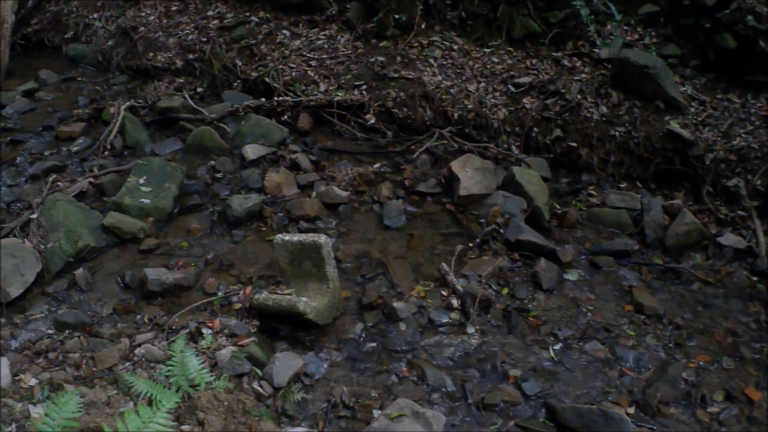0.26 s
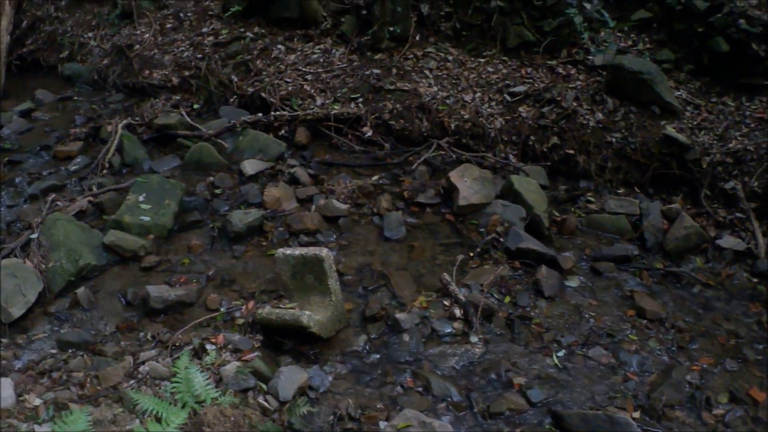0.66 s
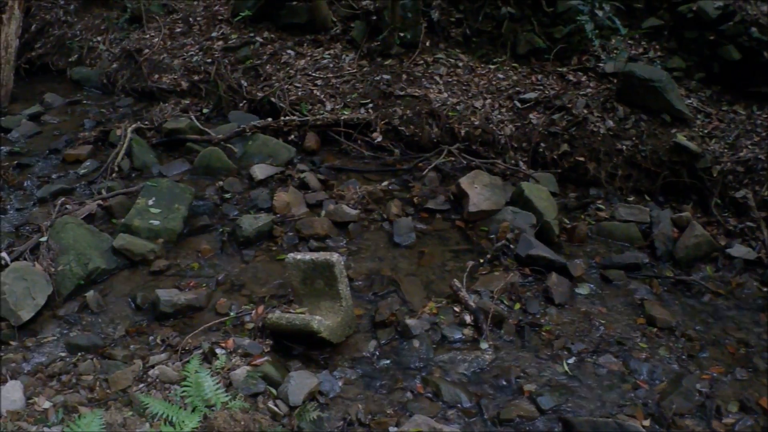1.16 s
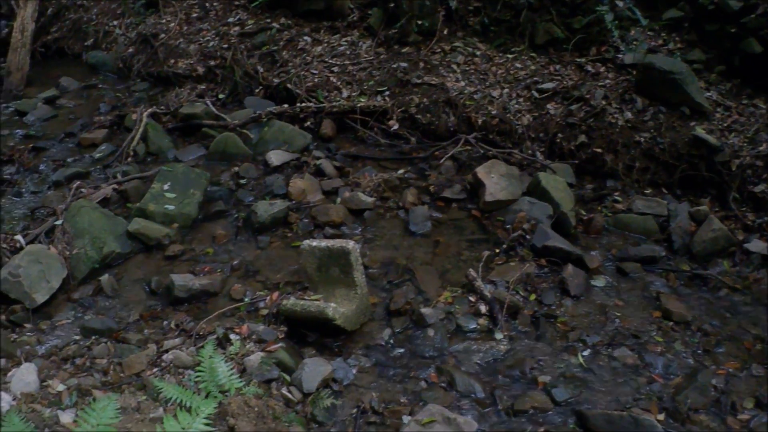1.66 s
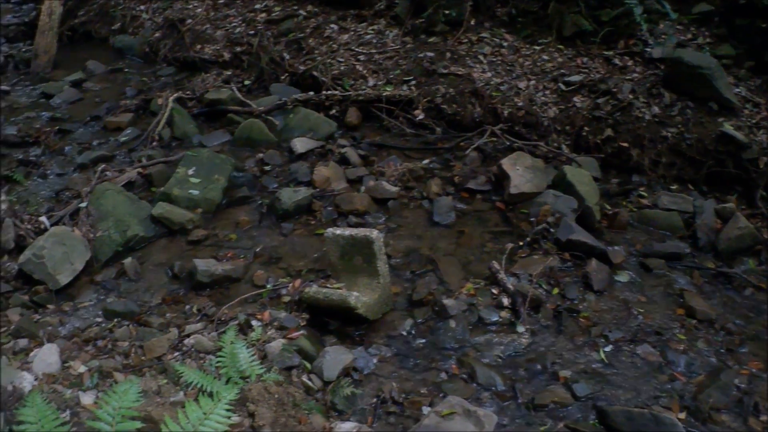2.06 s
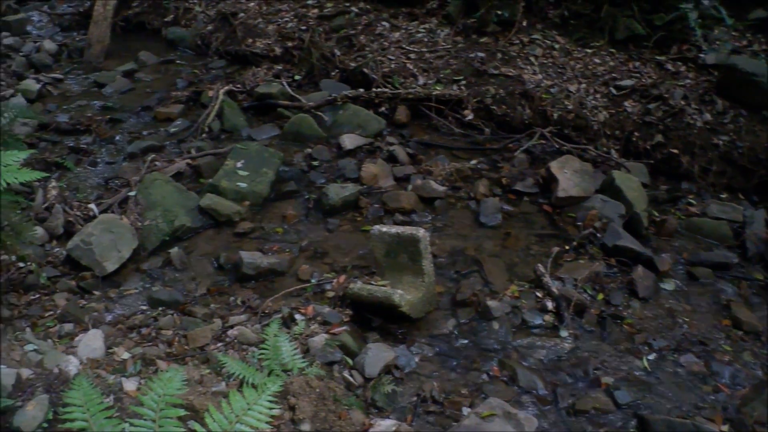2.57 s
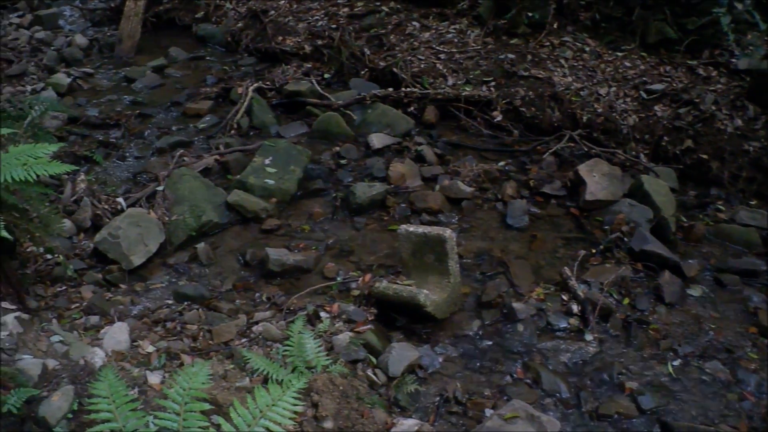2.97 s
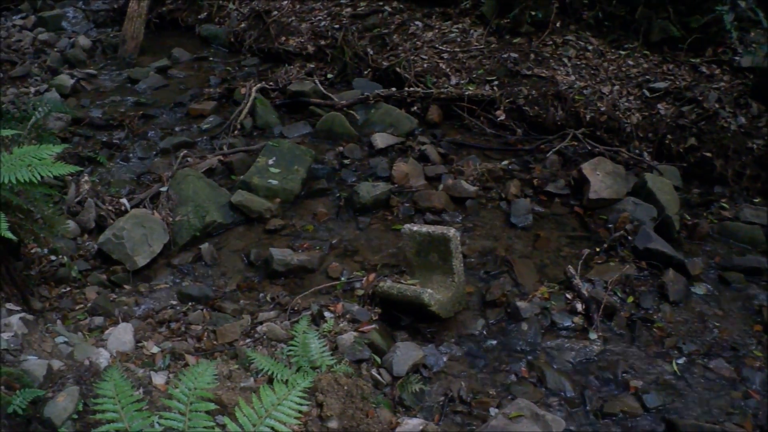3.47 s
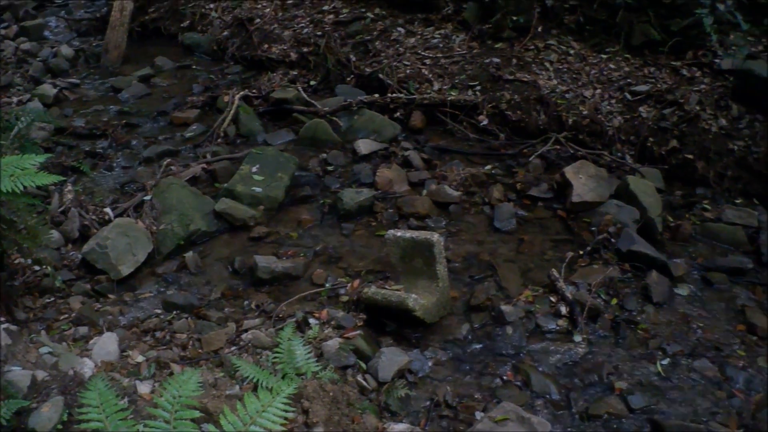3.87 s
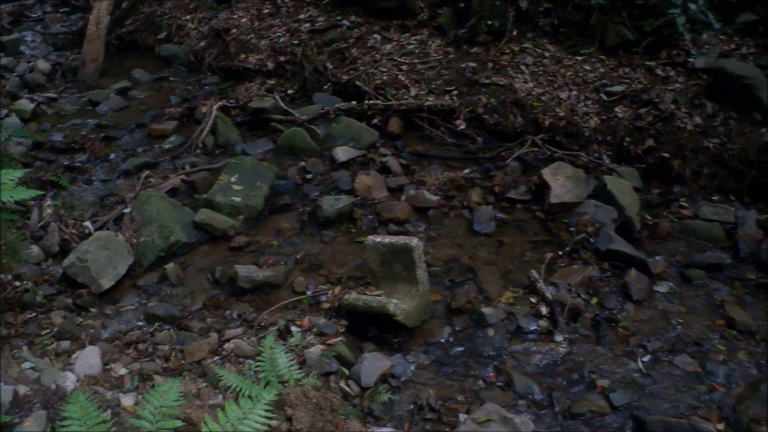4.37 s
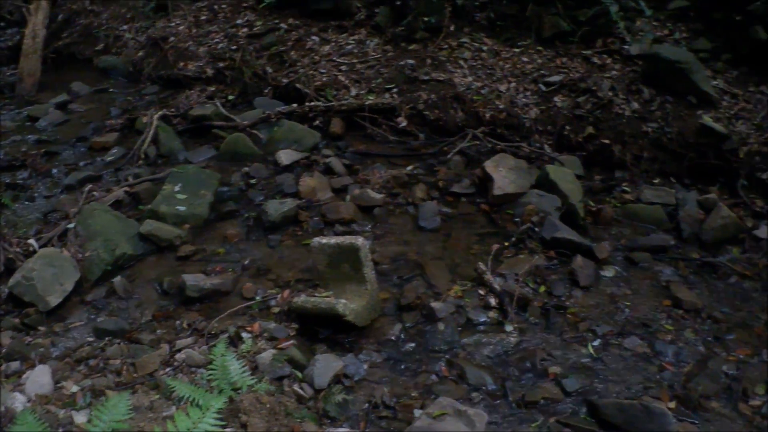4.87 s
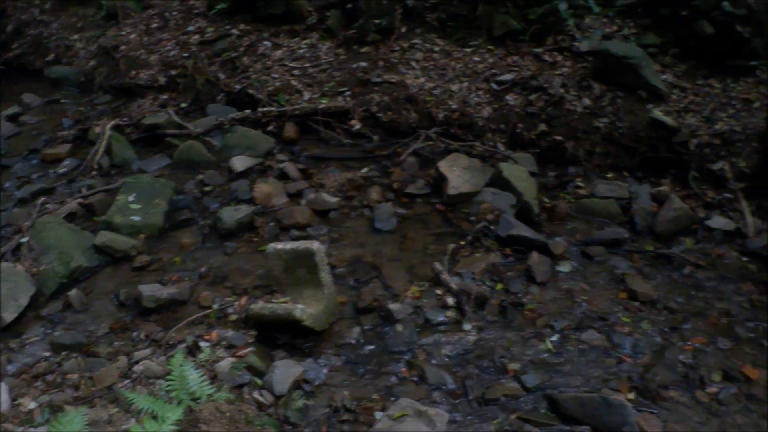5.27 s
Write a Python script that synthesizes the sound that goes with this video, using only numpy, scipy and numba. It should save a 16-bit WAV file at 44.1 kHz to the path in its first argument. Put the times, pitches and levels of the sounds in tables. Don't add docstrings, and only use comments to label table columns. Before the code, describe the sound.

A shallow woodland stream hisses and rumbles softly throughout, wide in stereo. From 0 to 0.7 s a faint distant bird gives short whistles, low, two high, low. From 0.7 to 1.8 s a nearer bird, towards the right, alternates high and low gliding, buzzy-edged whistles, five notes, with a woodland echo. Then only water until about 2.7 s, when the scene cuts closer to the stream. Faint clicks start at once; a weak short croak comes at 3.0 s with two small drops. Strong croaks follow at 3.4 (the longest), 3.7, 4.0 and 4.3 s, each a tight hollow buzz that slows and roughens, with stray clicks between. The water swells until 3.7 s, then sinks. At 4.65 s a rasp breaks into a rattle of loud clicks. Weaker, lower rasps come at 5.0 and 5.3 s, beside tiny drops and a very faint hollow gurgle, to the end at about 5.6 s.

```python
import sys
import numpy as np
from scipy import signal
from scipy.fft import rfft, irfft
from scipy.io import wavfile
from scipy.ndimage import uniform_filter1d
from numba import njit

SR = 44100
rng = np.random.default_rng(int(sys.argv[2]) if len(sys.argv) > 2 else 0)


def bounce(signal):
    frames = np.transpose(np.atleast_2d(signal))
    limited = np.clip(frames, -1, 1)
    pcm = np.round(limited * 32767).astype(np.int16)
    wavfile.write(sys.argv[1], SR, pcm)


def decibels_to_gain(level_db):
    exponent = np.asarray(level_db, float) / 20
    return 10 ** exponent


N = 243431


def along(table, hz):
    points_hz, values = np.transpose(table)
    return np.interp(np.log(hz), np.log(points_hz), values)


def curves(table):
    s, *columns = np.transpose(table)
    return np.array([np.interp(np.arange(N) / SR, s, column) for column in columns])


def walk(rate_hz):
    hold = int(SR / rate_hz)
    steps = np.repeat(rng.standard_normal(N // hold + 1), hold)
    return 1.41 * uniform_filter1d(uniform_filter1d(steps, hold), hold)[:N]


def placed(x, pan_db, lag):
    turn = np.exp(-2j * np.pi * np.arange(N // 2 + 1) / N * lag)
    left = irfft(rfft(x) * turn, N)
    return np.array([left * decibels_to_gain(pan_db / 2), x * decibels_to_gain(-pan_db / 2)])


def echoes(x, t60, gap_s):
    t = np.arange(int(1.2 * SR)) / SR
    fade = np.exp(-np.log(1000) * t / t60) * np.clip(t / gap_s, 0, 1)
    tail = rng.standard_normal((2, len(t))) * fade
    tail = tail / np.sqrt(np.sum(tail ** 2, 1, keepdims=True))
    return signal.fftconvolve(x[None], tail, axes=1)[:, :N]


CHANGE_S = 2.694
# hz, level_db (per Hz)
BANK = [(12, -36), (20, -8.5), (70, -2), (116, -6), (182, -6), (328, -11.5), (388, -7), (421, -10.5),
        (513, -12), (975, -10), (1610, -18.5), (1750, -19.5), (2520, -22), (5840, -20), (16000, -27.5)]
# hz, level_db (per Hz)
WATER = [(12, -33), (20, -8.5), (86, -2.5), (172, -8.5), (377, -10.5), (433, -10), (527, -8.5), (825, -12),
         (948, -8.5), (1330, -11.5), (2320, -19), (4290, -16.5), (9660, -16), (14700, -26.5), (16000, -17)]
# time_s, level_db
FLOW = [(0, -1.5), (2.2, -2), (2.69, -1), (3.2, 1), (3.7, 2), (4.0, 0.5), (4.25, -6.5), (4.9, -7.5),
        (5.35, -4.5), (5.6, -8)]
# hz, share (0-1)
FLOW_SHARE = [(150, 0.88), (700, 0.63), (3000, 0.2)]
# hz, likeness (0-1)
LIKENESS = [(60, 0.91), (300, 0.73), (1000, 0.72), (2500, 0.41), (8000, 0.07), (13000, 0.36)]
# hz, level_db
TILT = [(60, -2.4), (500, -1.6), (2000, -1), (6000, -3.5), (13000, -1.7)]


def stream(db, lag, swell_db, flicker_db):
    t = np.arange(N) / SR
    bins_hz = np.arange(1, N // 2 + 2) * SR / N
    flow = curves(FLOW)[0]
    for part in (t < CHANGE_S, t >= CHANGE_S):
        flow[part] -= flow[part].mean()
    shared, own = rfft(rng.standard_normal((2, N)))
    like = np.clip(along(LIKENESS, bins_hz), 0, 1)
    left = (like * shared + np.sqrt(1 - like ** 2) * own) * np.exp(-2j * np.pi * bins_hz * lag / SR)
    pair = np.array([left, shared]) * decibels_to_gain(np.outer([.5, -.5], along(TILT, bins_hz)))
    out, swell = 0, walk(15)
    for hz in 20 * 2 ** np.arange(0, 10.1, .5):
        share = np.clip(1 - 2 * np.abs(np.log2(bins_hz / hz)), 0, 1)
        follow = along(FLOW_SHARE, hz) * flow
        colour = np.where(t < CHANGE_S, along(BANK, hz) + db[0], along(WATER, hz) + db[1])
        wobble = swell_db * min(hz / 3000, 1) * swell + flicker_db * walk(20)
        out = out + decibels_to_gain(colour + follow + wobble) * irfft(pair * np.sqrt(share), N)
    return out


# start_s, length_s, start_hz, end_hz, level_db
DRIPS = [
    (2.968, 0.011, 2600, 2780, -49.5),
    (3.058, .01, 1350, 1400, -46),
    (4.87, .012, 5320, 5600, -53),
    (5.106, .008, 2250, 2350, -53),
    (5.118, .11, 580, 650, -52.5),
    (5.203, 0.31, 400, 396.5, -58),
]


def drips(waver=.04):
    out = np.zeros(N)
    for s, length, hz0, hz1, db in DRIPS:
        first = int(s * SR)
        part = np.linspace(0, 1, min(int(length * SR), N - first))
        hz = (hz0 + (hz1 - hz0) * part) * (1 + waver * walk(62.8)[:len(part)])
        ring = np.sin(2 * np.pi * np.cumsum(hz) / SR)
        out[first:][:len(part)] += decibels_to_gain(db) * np.sqrt(np.sin(np.pi * part)) * ring
    return placed(out, pan_db=-3.0, lag=0.81)


# time_s (from note start), pitch_hz, level_db
HIGH_NOTE = [(0, 6900, -11), (.02, 7250, -3), (.036, 6900, -2), (.052, 6600, 0), (.072, 6400, -3),
             (.085, 6950, -6), (.093, 7500, -20), (.102, 8200, -12), (.125, 8250, -14)]
LOW_NOTE = [(0, 3500, -13), (.022, 3900, -6), (.042, 4300, 0), (.062, 4600, -1), (.084, 4750, -1),
            (.1, 4580, -7), (.113, 4350, -6), (.124, 4080, -4), (.13, 3950, -14)]
FAR_HIGH = [(0, 6800, 3), (.015, 6540, -1), (.032, 7150, 0), (.042, 5800, -2), (.048, 5260, -7),
            (.072, 6700, 1.5), (.078, 6400, -8)]
FAR_LOW = [(0, 3650, 1), (.025, 4400, 0), (.046, 4850, -3), (.06, 4190, 0), (.078, 4920, -5),
           (.086, 4900, -5), (.1, 4100, 2)]
# note, start_s, level_db, stretch (ratio)
NEAR_SONG = [
    (HIGH_NOTE, .718, -44, 0.9),
    (LOW_NOTE, 0.942, -45.5, 1.0),
    (HIGH_NOTE, 1.172, -42, 0.96),
    (LOW_NOTE, 1.405, -45.5, 1.03),
    (HIGH_NOTE, 1.628, -41.5, 1.03),
]
# note, start_s, level_db, stretch (ratio)
FAR_SONG = [
    (FAR_LOW, -.07, -54, 1.0),
    (FAR_HIGH, .158, -57, 1.0),
    (FAR_HIGH, .348, -57, 1.08),
    (FAR_LOW, .538, -53, 1.0),
]


def bird(song, warble_hz, depth, pan_db, lag, wet_db, t60, far_db):
    out, t = np.zeros(N), np.arange(N) / SR
    for note, start, db, stretch in song:
        s, hz, shape_db = np.transpose(note)
        s = start + stretch * s
        on = (t > s[0]) & (t < s[-1])
        pitch = np.interp(t[on], s, hz) * (1 + depth * np.sin(2 * np.pi * warble_hz * t[on]))
        edge = np.clip(np.minimum(t[on] - s[0], s[-1] - t[on]) / 0.0028, 0, 1)
        level = decibels_to_gain(db + np.interp(t[on], s, shape_db)) * edge
        out[on] += level * np.sin(2 * np.pi * np.cumsum(pitch) / SR)
    dull = signal.sosfilt(signal.butter(2, 5500, fs=SR, output="sos"), out)
    near_woods = decibels_to_gain(wet_db) * echoes(out, t60, gap_s=.006)
    far_woods = decibels_to_gain(far_db) * echoes(dull, t60=1.2, gap_s=.08)
    return placed(out, pan_db, lag) + near_woods + far_woods


# start_s, length_s, first_rate_hz, peak_db, lower_db (lower chamber re upper)
RASPS = [(3.381, 0.035, 371, -30.5, -8.5), (4.650, 0.018, 294.7, -19.5, -8),
         (5.02, .011, 269.5, -33.5, 3.5), (5.031, .016, 444, -29.5, -8.5), (5.051, .015, 394.3, -29, -15.5),
         (5.067, .017, 275, -32.5, 5.5), (5.089, 0.013, 259, -39.5, 7.5), (5.329, 0.018, 293.5, -26, -7.5),
         (5.348, .018, 285, -32.5, 3.5), (5.377, 0.015, 276, -40, 4.5), (5.401, 0.02, 286, -45, -19)]


def rasp(start, length, first_hz, db, low_db):
    sag_hz_per_s, edge_db, taut_hz = 680, -1, 350
    t = np.arange(0, length, 1 / SR)
    hums = low_db > 0 or first_hz > taut_hz
    rough = .1 if hums else .25
    level_db = db + edge_db * (2 * t / length - 1) ** 2
    return start + t, first_hz - sag_hz_per_s * t, level_db, low_db + 0 * t, rough + 0 * t


# start_s, length_s, first_rate_hz, held_s, peak_db
CROAKS = [
    (2.986, 0.051, 352, 0.0056, -26.5),
    (3.384, 0.086, 469, 0.031, -19),
    (3.672, .068, 462, .012, -17),
    (3.964, .073, 455.6, 0.0122, -16.5),
    (4.284, .051, 407.7, 0.015, -17),
]
# rest_share (0-1), effort_db, lower_db (lower chamber re upper)
LET_DOWN = [(0, 0, -14), (.28, -6, -13), (.6, -2.5, -6.5), (.8, -9, -2), (1, -14, 1)]


def croak(start, length, first_hz, held, db):
    drift_hz_per_s, sag_share = 1000, .8
    t, rest = np.arange(0, length, 1 / SR), length - held
    slack_hz = .241 * np.interp(start, *np.transpose(THROAT)[:2])
    turns_s = [0, held, held + sag_share * rest]
    hz = np.interp(t, turns_s, [first_hz, first_hz - drift_hz_per_s * held, slack_hz])
    opening = (-held / rest, -4, -11)
    share, effort_db, low_db = np.transpose([opening] + LET_DOWN)
    s = held + share * rest
    rough = .022 + .75 * t + .007 * (max(row[4] for row in CROAKS) - db)
    return start + t, hz, db + np.interp(t, s, effort_db), np.interp(t, s, low_db), rough


def add(track, s, size):
    at = (s - .0012) * SR
    np.add.at(track, at.astype(int), size * (1 - at % 1))
    np.add.at(track, at.astype(int) + 1, size * (at % 1))


# start_s, peak_db, lower_db (lower chamber re upper)
CLICKS = [(2.6986, -31, -14), (2.7122, -32.5, -4.5), (2.7307, -34, -5), (2.958, -38, -9),
          (2.9678, -33.5, 0), (3.1138, -39.5, 1), (3.3501, -41.5, 6), (3.3744, -36, 1), (3.4734, -37, -4),
          (3.4945, -35.5, 1.5), (3.6366, -35, -0.5), (3.7446, -37, -8), (3.753, -41.5, 6),
          (3.933, -40, 5.5), (4.2485, -34.5, 1), (4.3435, -22.5, -4), (4.354, -27, -4),
          (4.3684, -41.5, 6.5), (4.606, -37, 4), (4.6714, -23.5, -5), (4.6782, -19.5, -4),
          (4.6828, -22, -5), (4.6922, -25, -3), (4.698, -18, -9), (4.7109, -26.5, 1), (4.72, -27.5, -1.5),
          (4.741, -46, 2), (5.109, -44, 11), (5.3018, -40.5, 3), (5.3124, -40, -12)]


def cords(slip=.3, scatter_db=7.0):
    upper, lower = np.zeros(N), np.zeros(N)
    calls = [croak(*row) for row in CROAKS] + [rasp(*row) for row in RASPS]
    for t, hz, db, low_db, rough in calls:
        cycles = np.cumsum(hz) / SR
        beats = np.interp(np.arange(int(cycles[-1]) + 1), cycles, t)
        chance = rng.standard_normal((2, len(beats))) * np.interp(beats, t, rough)
        size = decibels_to_gain(np.interp(beats, t, db) + scatter_db * chance[1])
        moved = beats + slip * chance[0] / np.interp(beats, t, hz)
        add(upper, moved, size)
        add(lower, moved, size * decibels_to_gain(np.interp(beats, t, low_db)))
    s, db, low_db = np.transpose(CLICKS)
    add(upper, s, decibels_to_gain(db))
    add(lower, s, decibels_to_gain(db + low_db))
    return upper, lower


@njit
def svf(x, hz, width):
    y, b, l = np.empty(len(x)), 0., 0.
    for i in range(len(x)):
        g, k = np.tan(np.pi * hz[i] / SR), width[i] / hz[i]
        v = (b + g * (x[i] - l)) / (1 + g * (g + k))
        b, l, y[i] = 2 * v - b, l + 2 * g * v, k * v
    return y


def chamber(x, hz, width_hz):
    y = x + 1e-18
    for side in (-.38, .38, -.38, .38):
        y = svf(y, hz + side * width_hz, .85 * width_hz)
    return y * SR / (.9 * width_hz)


# time_s, upper_hz, lower_hz, leak_db (broad leak past the chambers)
THROAT = [(2.7, 1060, 590, -10), (3.0, 1095, 630, -4), (3.4, 1185, 605, -18), (3.7, 1215, 620, -26),
          (4.7, 1215, 600, -20), (5.03, 1167, 505, -7), (5.4, 1195, 515, -6)]


def throat(upper, lower):
    upper_hz, lower_hz, leak_db = curves(THROAT)
    lower_width = 310 + .7 * (lower_hz - 600)
    voice = chamber(upper, upper_hz, 1.1 * lower_width) + chamber(lower, lower_hz, lower_width)
    mouth = decibels_to_gain(-29) * chamber(upper, np.full(N, 1850.), np.full(N, 330.))
    leak = decibels_to_gain(leak_db) * chamber(upper, np.full(N, 1150.), np.full(N, 1000.))
    return signal.sosfilt(signal.butter(4, 370, "high", fs=SR, output="sos"), voice + mouth + leak)


def frog():
    voice = throat(*cords())
    voice = voice + decibels_to_gain(-13) * echoes(voice, t60=.05, gap_s=.003)[0]
    return placed(voice, pan_db=-.9, lag=1.0) + decibels_to_gain(-22) * echoes(voice, t60=.3, gap_s=.006)


def scene():
    water = stream(db=(-33, -33), lag=2.2, swell_db=0.5, flicker_db=1.28)
    far = bird(FAR_SONG, warble_hz=172, depth=.01, pan_db=-8.0, lag=1.2, wet_db=-10.0, t60=0.18, far_db=-18.0)
    near = bird(NEAR_SONG, warble_hz=190, depth=.028, pan_db=-10.0, lag=2.0, wet_db=0.0, t60=.25, far_db=-3.0)
    return water + drips() + far + near + frog()


def top_cut(x):
    return signal.sosfilt(signal.butter(12, 15800, fs=SR, output="sos"), x)


def record(dry):
    return top_cut(dry)


dry = scene()
out = record(dry)
bounce(out)
```